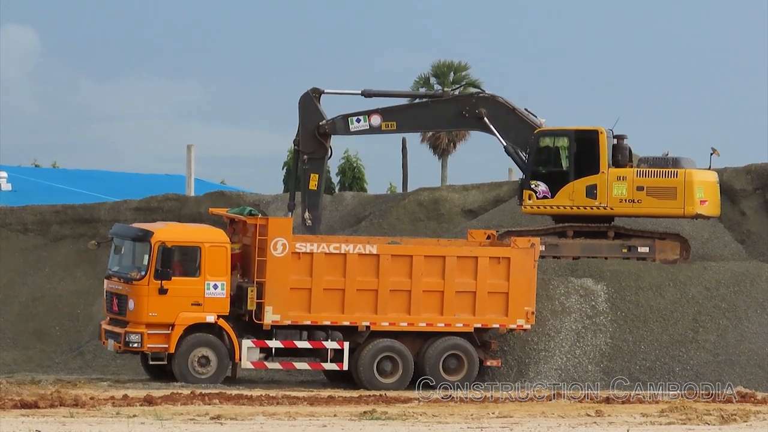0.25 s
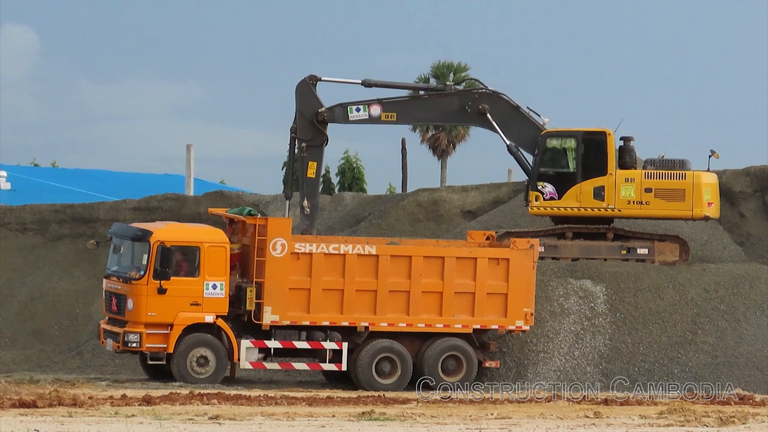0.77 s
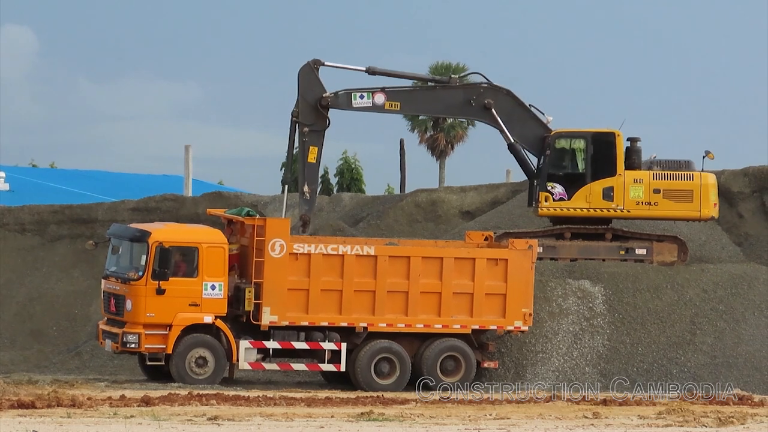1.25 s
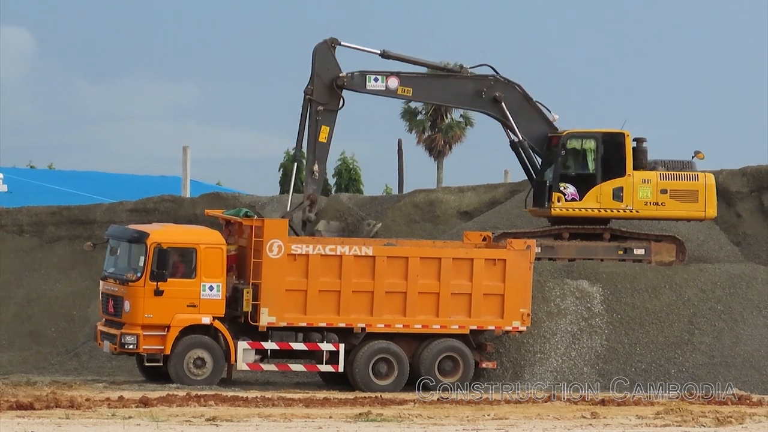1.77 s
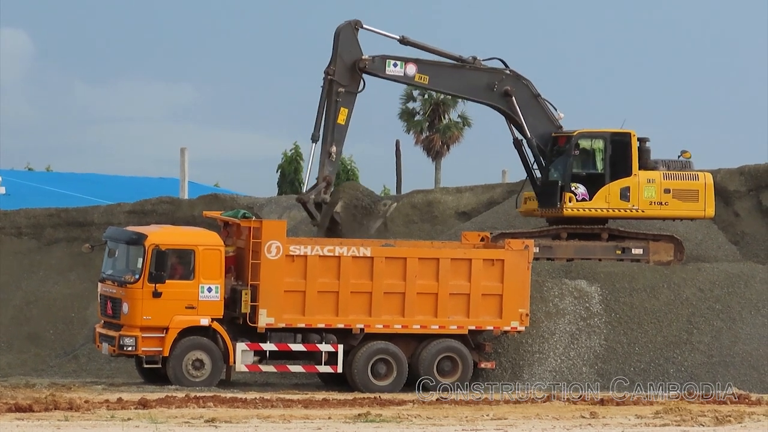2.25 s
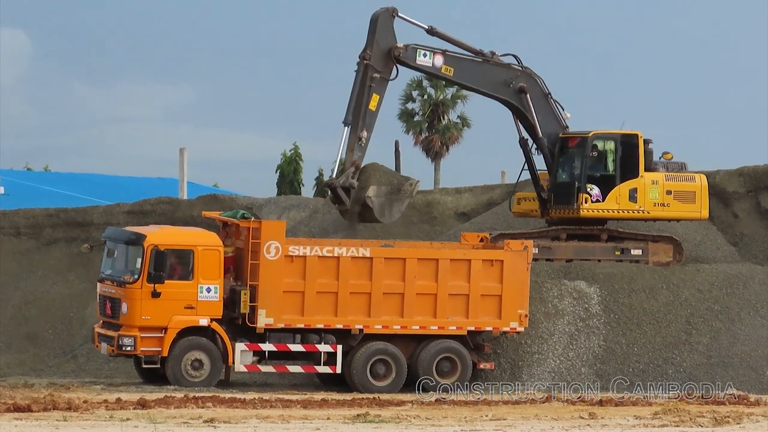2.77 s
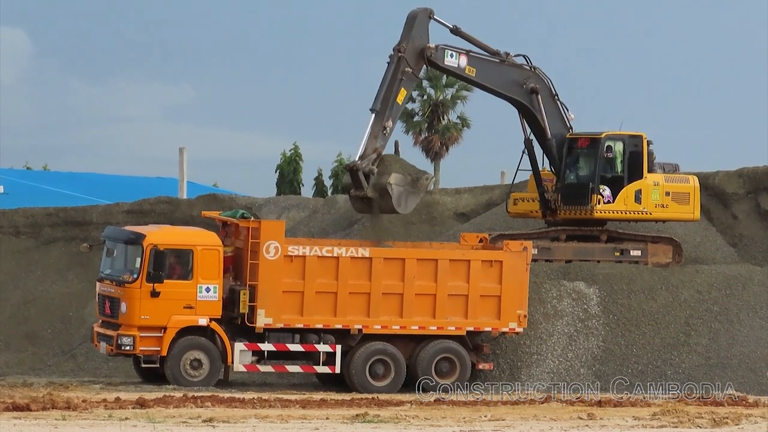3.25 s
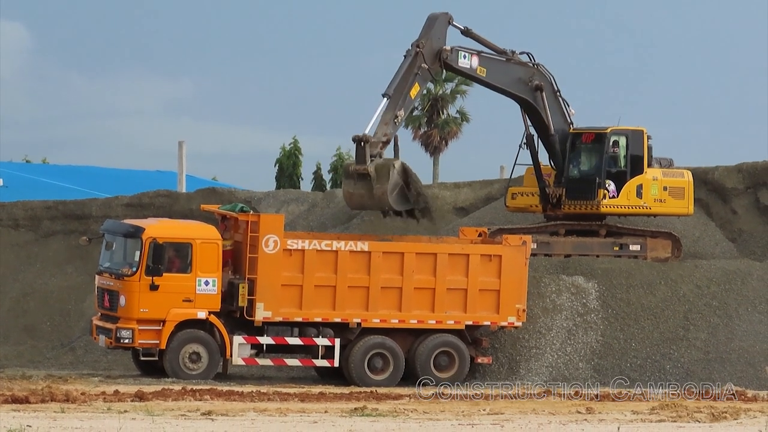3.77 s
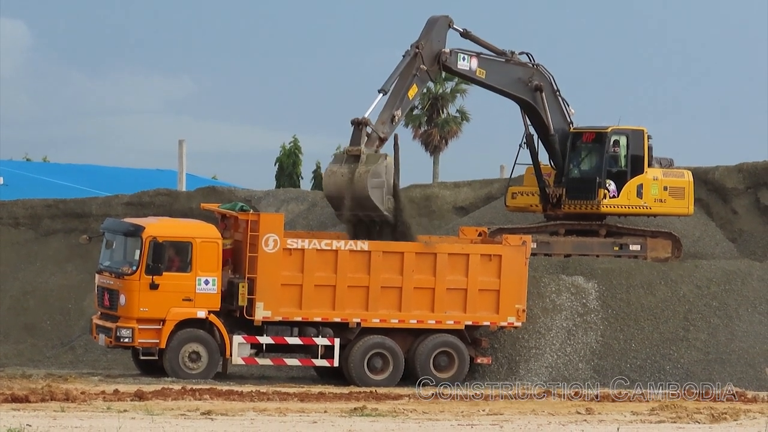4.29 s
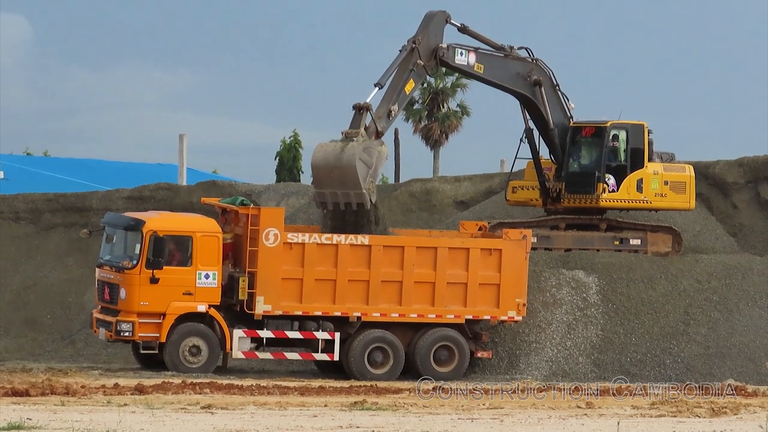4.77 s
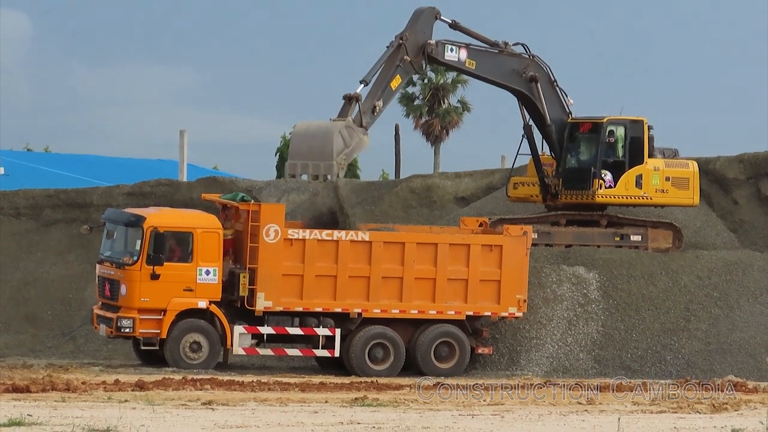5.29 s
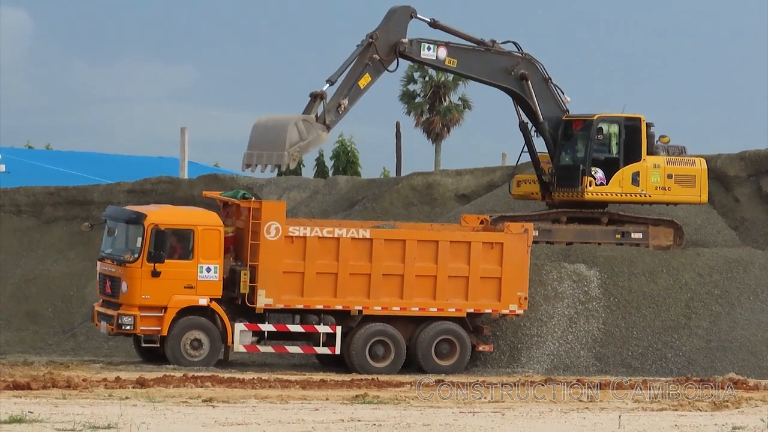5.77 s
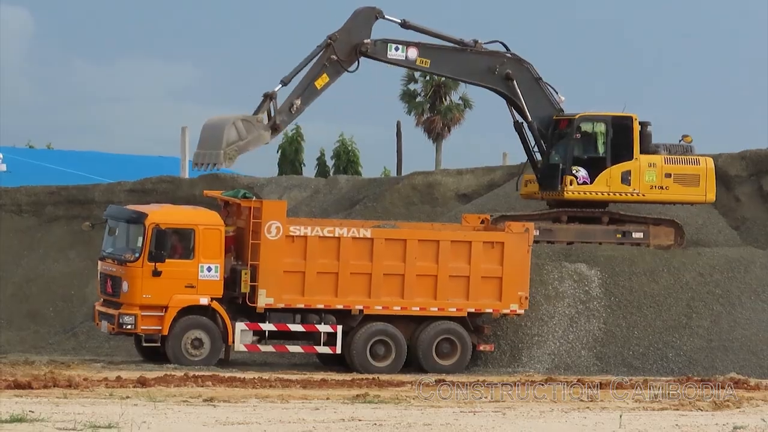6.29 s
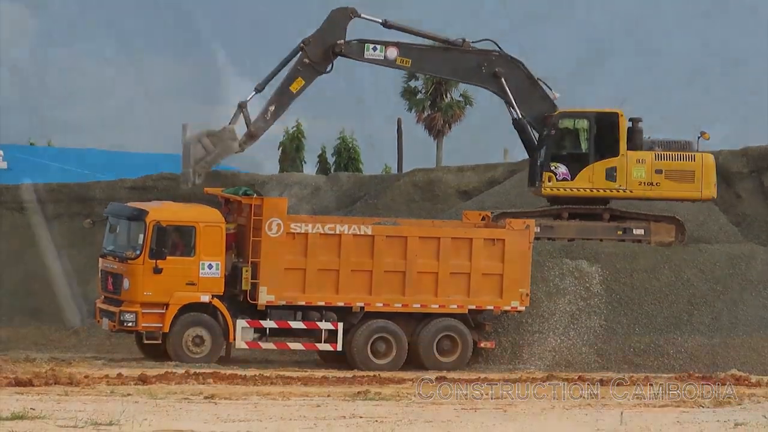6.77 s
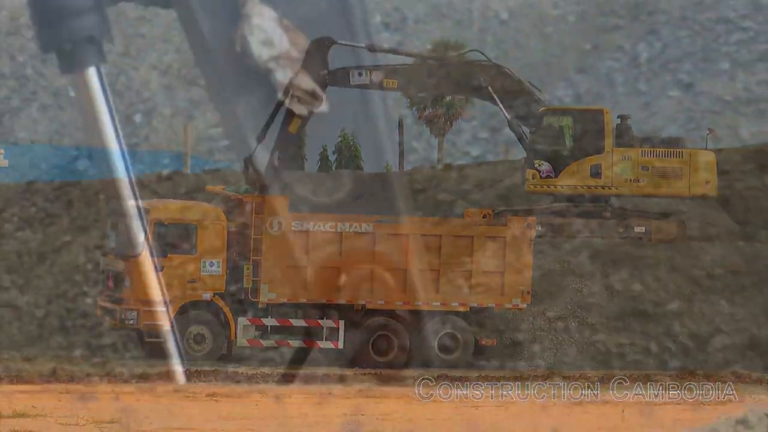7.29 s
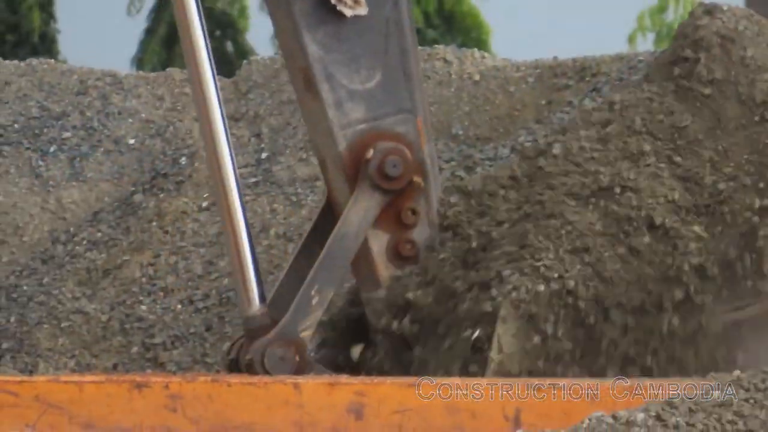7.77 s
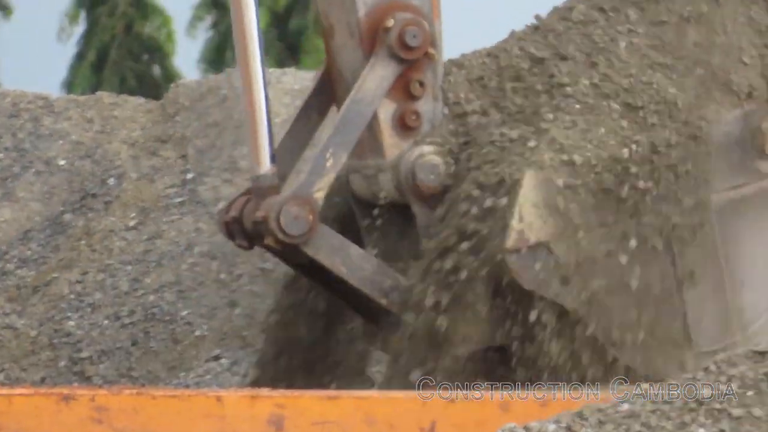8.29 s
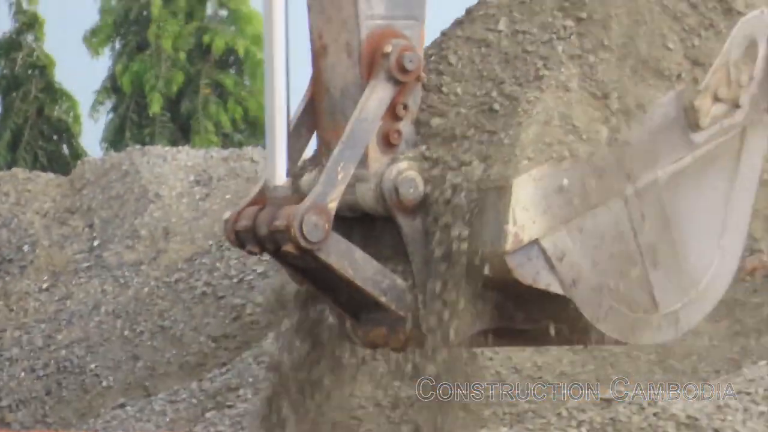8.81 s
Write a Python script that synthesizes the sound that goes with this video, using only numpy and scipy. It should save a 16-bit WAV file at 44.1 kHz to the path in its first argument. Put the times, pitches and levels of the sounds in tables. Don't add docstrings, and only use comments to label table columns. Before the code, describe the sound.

Steady low diesel idle drones as gravel pours in bursts onto a steel truck bed, the bucket clanks, then a closer scoop heaves and squeaks.

```python
import sys
import numpy as np
from scipy import signal
from scipy.fft import rfft, irfft, next_fast_len
from scipy.io import wavfile

SR = 44100
rng = np.random.default_rng(int(sys.argv[2]) if len(sys.argv) > 2 else 0)


def voltage_ratio(decibels):
    exponent = np.asarray(decibels, float) / 20
    return 10 ** exponent


def store_wav(level_fs):
    pcm = np.round(np.clip(np.atleast_2d(level_fs), -1, 1) * 32767)
    wavfile.write(sys.argv[1], SR, pcm.T.astype(np.int16))


N = 398663
CUT_S = 7.195
SQUEAL_START_S, SQUEAL_END_S = 7.875, 8.05

# time in s, firing rate in Hz, level in dB.
TRUCK_IDLE = [(0, 37.39, -23.5), (2, 37.71, -23), (4, 37.02, -23), (5.5, 37.31, -23), (7.19, 37.46, -23)]


def in_time(rows):
    s, *columns = np.transpose(rows)
    return [np.interp(np.arange(N) / SR, s, c) for c in columns]


def rms_one(x):
    return x / np.sqrt(np.mean(x ** 2) + 1e-20)


def gate(start_s, end_s, fade_s=0.0072):
    t = np.arange(N) / SR
    return np.clip((t - start_s) / fade_s, 0, 1) * np.clip((end_s - t) / fade_s, 0, 1)


def drift(rate_hz):
    r = np.exp(-2 * np.pi * rate_hz * 40 / SR)
    slow = signal.lfilter([1], [1, -2 * r, r * r], rng.standard_normal(N // 40 + 2002))
    slow = slow[2000:]
    return np.interp(np.arange(N) / 40, np.arange(len(slow)), rms_one(slow))


def resonate(x, hz, width_hz):
    r = np.exp(-np.pi * width_hz / SR)
    poles = [1, -2 * r * np.cos(2 * np.pi * hz / SR), r * r]
    return signal.lfilter([(1 - r * r) / 2, 0, (r * r - 1) / 2], poles, x)


def through(x, bands):
    out = 0
    for k, (hz, width_hz, db) in enumerate(bands):
        ring = resonate(resonate(x, hz, 1.46 * width_hz), hz, 1.46 * width_hz)
        out = out + voltage_ratio(db) * rms_one(ring) * (-1) ** k
    return out


def wobbly_sine(hz, level_db, wobble_db):
    phase = 2 * np.pi * np.cumsum(hz * np.ones(N)) / SR
    phase = phase + .15 * wobble_db * drift(1.5) + rng.uniform(0, 2 * np.pi)
    return np.sqrt(2) * voltage_ratio(level_db + wobble_db * np.tanh(drift(2.3))) * np.sin(phase)


def strokes(rows, fade_s, wobble_db):
    glide, level = [], 0
    for start_s, end_s, start_hz, end_hz, db in rows:
        glide += [(start_s, start_hz), (end_s, end_hz)]
        level = level + voltage_ratio(db) * gate(start_s, end_s, fade_s)
    hz, = in_time(glide)
    return wobbly_sine(hz, 0, wobble_db) * level


def peak_db(t, s, rise_ms, fall_ms):
    return -1e4 * np.maximum((s - t) / rise_ms, (t - s) / fall_ms)


def burst(length_s, t60_s):
    t = np.arange(int(length_s * SR)) / SR
    return rng.standard_normal(len(t)) * voltage_ratio(-60 * t / t60_s)


def add(track, s, sound):
    at = int(s * SR)
    track[at:at + len(sound)] += sound[:N - at]


def truck():
    # multiple of the firing rate, level against the idle in dB.
    orders = [(0.498, -42), (.75, -27), (0.828, -15), (1, 3), (2, -21), (3, -16.5), (4, -24), (5, -26),
              (6.5, -25), (7, -28.5), (8, -31.5)]
    # frequency in Hz, level in dB.
    whines = [(82.8, -41.5), (389.6, -65.5), (537.7, -52.5), (621, -62), (860, -73), (1050, -61),
              (1798, -58.5), (2864, -60), (3338, -62)]
    hz, level_db = in_time(TRUCK_IDLE)
    lines = sum(wobbly_sine(k * hz, level_db + db, .3 + abs(db) / 12) for k, db in orders)
    return gate(-1, CUT_S) * (lines + sum(wobbly_sine(*line, 3) for line in whines))


def excavator():
    # time in s, half firing rate in Hz, level in dB.
    engine = [(0, 48.5, -32.5), (1.5, 47.45, -30), (2.5, 48.14, -40), (3.5, 49.44, -30), (4.5, 47.6, -40),
              (5.5, 49.47, -38), (7.19, 48.32, -31.5), (7.2, 44, -27), (7.6, 45.2, -36.5),
              (8.2, 46.34, -32.5), (9.04, 49, -37.5)]
    # multiple of half the firing rate, level in dB.
    orders = [(1, -6.5), (2, -11), (3, -14.5), (4, -11.5), (7, -23.5)]
    # peak time in s, firing line gain in dB.
    heaves = [
        (7.65, 15.5),
        (8.1, 15),
        (8.9, 15.5),
    ]
    hz, level_db = in_time(engine)
    firing_db, = in_time([(0, -7.5), (CUT_S, 5)])
    for s, db in heaves:
        firing_db = np.maximum(firing_db, db + peak_db(np.arange(N) / SR, s, 220, 220))
    return sum(wobbly_sine(k * hz, level_db + db + (k == 2) * firing_db, 3) for k, db in orders)


def roar(spectrum, patchy_db, throb, load_db):
    # centre in Hz, width in Hz, gain in dB.
    cover = [(196, 30, -3.5), (740, 90, 4.5), (1100, 420, 3.5), (1730, 230, 1.5), (2600, 380, 0.5),
             (3695, 190, 3.5)]
    size = next_fast_len(N)
    hz = np.maximum(np.fft.rfftfreq(size, 1 / SR), 1)
    points = np.array(spectrum)
    colour_db = np.interp(np.log(hz), np.log(points[:, 0]), points[:, 1])
    colour_db = colour_db + sum(db / (1 + (2 * (hz - top) / width) ** 2) for top, width, db in cover)
    bins = rfft(rng.standard_normal(size)) * voltage_ratio(colour_db)
    together, out = drift(0.94), 0
    for octave in range(10):
        share = np.clip(1 - np.abs(np.log2(hz / 30) - octave), 0, 1)
        bright = np.clip((octave - 4) / 2, 0, 1)
        flicker_db = patchy_db * (.5 * together + drift(2.9))
        out = out + irfft(bins * share, size)[:N] * voltage_ratio(flicker_db + bright * load_db)
    beat = np.cos(2 * np.pi * np.cumsum(in_time(TRUCK_IDLE)[0]) / SR)
    return rms_one(out) * (1 + throb * beat)


def roars():
    # frequency in Hz, density in dB per Hz.
    wide_spectrum = [(15, -26), (40, -22), (56, -7.5), (75, -14.5), (117, -10), (145, -15), (182, -14),
                     (247, -18.5), (368, -29.5), (535, -30), (937, -34), (2170, -35), (2750, -32),
                     (8840, -51.5), (15500, -80)]
    close_spectrum = [(14, -30), (22, -12), (35, 1), (92, 1.5), (196, -6), (290, -16), (650, -20.5),
                      (1270, -23), (2200, -22), (3000, -22), (4300, -28), (7000, -33.5), (8800, -42.5),
                      (15500, -62)]
    # time in s, treble gain in dB.
    load = [(0, 1.5), (1.5, 2), (3, -0.5), (6.6, -1.5), (7.19, -1), (8, -3), (9.04, -3.5)]
    load_db, = in_time(load)
    before = gate(-1, CUT_S)
    wide = voltage_ratio(-32) * roar(wide_spectrum, patchy_db=0.55, throb=.04, load_db=load_db)
    close = voltage_ratio(-30) * roar(close_spectrum, patchy_db=.5, throb=0, load_db=load_db)
    return before * wide + (1 - before) * close


def grains(bands, per_s, spread_db, clump_db):
    sizes = voltage_ratio(spread_db * np.minimum(rng.exponential(1, N), 5)) * rng.choice([-1, 1], N)
    hits = sizes * (rng.random(N) < per_s / SR) + 1e-18
    rings = 0
    for k, band in enumerate(bands):
        own_hits = np.roll(hits, 9973 * k)
        rings = rings + through(own_hits, [band]) * voltage_ratio(clump_db * drift(12.0))
    return rms_one(rings) * voltage_ratio(clump_db * drift(35.0))


def flow():
    # peak in s, level in dB, rise and fall in ms per 10 dB, coarseness in dB.
    slugs = [(3.165, -36, 51, 80, 2.5), (3.225, -31.5, 68, 200, 6.5), (3.4, -32.5, 38, 58, 3.5),
             (3.53, -37, 140, 80, 0.5), (3.643, -35.5, 54, 250, -4), (3.785, -33.5, 430, 180, 1),
             (4.023, -33, 95, 45, 0.5), (4.075, -34.5, 19, 90, -0.5), (4.171, -35.5, 22, 320, -2),
             (4.405, -29, 130, 190, -2.5), (4.519, -31.5, 47, 50, -0.5), (4.66, -38, 600, 550, -3),
             (4.87, -43.5, 60, 100, 6.5), (4.912, -34, 22, 27, -2), (5.175, -39, 332, 180, 2.5),
             (5.58, -39, 360, 221, -1.5), (5.75, -45, 231, 550, 1.5)]
    t, power = np.arange(0, N / SR, .002), 1e-12
    for s, level_db, rise_ms, fall_ms, coarse_db in slugs:
        shares_db = np.array([[-2 + coarse_db], [0], [-10 - .9 * coarse_db]])
        power = power + voltage_ratio(2 * (shares_db + level_db + peak_db(t, s, rise_ms, fall_ms)))
    return in_time(np.transpose([t, *np.sqrt(power)]))


def gravel():
    # time in s, level in dB.
    trickle_flow = [(.8, -64), (1.5, -51), (2.2, -49), (3.05, -48), (3.3, -56), (5.9, -51.5), (6.15, -58),
                    (6.55, -65), (7.1, -53.5), (7.6, -56.5), (8.1, -57.5), (8.3, -51), (8.7, -43.5),
                    (9.04, -44)]
    # centre in Hz, width in Hz, level in dB.
    fines_bands = [(4660, 2400, -3), (6150, 1200, 0.5), (7270, 760, -2)]
    stone_bands = [(1113, 170, -12.5), (1600, 200, -9.5), (1950, 120, -9.5), (2470, 230, -6.5),
                   (2805, 430, -1.5), (3250, 520, -1), (3290, 39, -7), (3860, 540, -4), (4560, 440, -9.5)]
    slide_bands = [(4300, 1700, -1), (5735, 1040, 0), (6300, 880, -2.5), (7070, 810, 0)]
    grit_bands = [(8380, 2400, 3.5), (10000, 1300, -3), (10900, 600, -9), (11900, 550, -12),
                  (14200, 1500, -39)]
    fines = grains(fines_bands, 12000, spread_db=2.0, clump_db=0.84)
    grit = grains(grit_bands, 12000, spread_db=2.5, clump_db=0.85)
    stones = grains(stone_bands, 7000, spread_db=1.0, clump_db=1.4)
    slide = grains(slide_bands, 12000, spread_db=1.5, clump_db=1.0)
    trickle = voltage_ratio(in_time(trickle_flow)[0]) * (fines + voltage_ratio(-9.5) * grit)
    pour = sum(gain * share for gain, share in zip(flow(), [stones, slide, grit]))
    pour = gate(3.04, 5.92, 0.069) * pour
    shed = voltage_ratio(-58) * gate(SQUEAL_START_S, SQUEAL_END_S, 0.022) * grit
    return trickle + pour + shed


def pump():
    # start and end in s, start and end in Hz, level in dB.
    whine_strokes = [
        (.9, 1.3, 497, 490, -54),
        (3.05, 3.45, 508.6, 509, -51),
        (3.6, 4.0, 488, 493, -53),
        (4.1, 4.65, 500, 512, -52),
        (5.25, 5.85, 491, 481, -53.5),
    ]
    return gate(-1, CUT_S) * strokes(whine_strokes, 0.066, 4)


def fan():
    # start and end in s, start and end in Hz, level in dB.
    efforts = [
        (1.9, 2.6, 49.5, 51.5, -36),
        (2.9, 4.6, 53.23, 53.14, -29.5),
        (5.05, 5.6, 52.1, 54, -30.5),
        (5.85, 7.0, 51.46, 54.8, -32.5),
    ]
    return gate(-1, CUT_S) * strokes(efforts, 0.13, 1.8)


def ticks(table, breadth, trim_db):
    out = np.zeros(N)
    for s, top_db, hz, t60_s in table:
        crack = through(burst(.15, max(t60_s, .005)), [(hz, breadth * hz, 0)])
        add(out, s, voltage_ratio(top_db + trim_db) * crack / np.abs(crack).max())
    return out


def single_stones():
    # time in s, peak in dB, pitch in Hz.
    stones = [(3.1595, -21, 2870), (3.192, -26, 3310), (3.385, -21, 3370), (3.636, -27, 3356),
              (4.0677, -28, 3350), (4.193, -25, 3360), (4.6504, -27, 2600), (4.8512, -31, 3250),
              (4.868, -24, 3770), (5.1076, -32, 2880), (5.5692, -33, 6474), (6.475, -30, 1290),
              (7.1556, -23.5, 1950)]
    return ticks([(*row, 0.065) for row in stones], breadth=0.61, trim_db=0.5)


def chips():
    # time in s, peak in dB, pitch in Hz.
    hits = [(3.488, -34, 8540), (4.068, -33, 8660), (4.1679, -25, 9850), (4.2974, -29, 9840),
            (4.3895, -22, 8900), (4.5194, -22, 9060), (4.65, -30, 9910), (4.7222, -29, 9730),
            (4.9062, -23, 10700), (4.9813, -26, 9800), (5.2071, -37, 8880), (6.268, -43, 11000),
            (7.872, -42, 8590), (7.888, -32, 8680), (7.9364, -38, 10700), (8.0294, -42, 8540),
            (8.0681, -44, 8640), (8.2194, -46, 8520)]
    return ticks([(*row, 0.036) for row in hits], breadth=0.22, trim_db=-3.5)


def pin_knocks():
    # time in s, peak in dB, pitch in Hz, t60 in s.
    knocks = [
        (4.905, -25.5, 3000, .1),
        (4.907, -25, 6500, .06),
        (7.863, -32, 3500, .08),
        (7.867, -32, 1400, 0.052),
        (7.888, -26.5, 4200, 0.04),
        (7.937, -28.5, 430, 0.095),
        (7.938, -36, 1100, .06),
        (7.938, -29, 2300, 0.045),
        (7.938, -34, 6000, .03),
    ]
    return ticks(knocks, breadth=0.3, trim_db=0)


def rock():
    impact = (4.9815, -29.5, 0.17)
    # centre in Hz, width in Hz, level in dB.
    plate_bands = [(1870, 450, -7), (2500, 450, -3), (3000, 550, 3), (3370, 33, -0.5), (3830, 700, -3),
                   (4500, 1100, 1), (5530, 760, 3.5), (6120, 830, 0), (7350, 720, -8)]
    s, level_db, t60_s = impact
    out, force = np.zeros(N), burst(.2, t60_s)
    force = force * np.minimum(1.1 + np.arange(len(force)) / (0.003 * SR), 1)
    add(out, s, voltage_ratio(level_db) * rms_one(through(force, plate_bands)))
    return out


def struck(excitation, modes):
    out = 0
    for hz, level_db, t60_s in modes:
        r, w = voltage_ratio(-60 / (t60_s * SR)), 2 * np.pi * hz / SR
        ring = signal.lfilter([0, np.sin(w)], [1, -2 * r * np.cos(w), r * r], excitation)
        out = out + voltage_ratio(level_db) * ring
    return out


def clank():
    # time in s, level in dB, hardness in Hz, t60 in s.
    blows = [
        (5.822, -24.5, 4970, .2),
        (5.835, -23.5, 3000, 0.18),
        (5.85, -24, 3000, 0.18),
        (5.862, -18.5, 5000, 0.17),
        (5.877, -28, 4000, 0.21),
        (5.906, -27.5, 2000, .2),
        (5.939, -25, 4000, 0.21),
        (5.968, -33.5, 2500, 0.25),
        (6.0, -44, 1500, 0.23),
        (6.06, -38, 2500, 0.37),
    ]
    # frequency in Hz, level in dB, t60 in s.
    plate_modes = [(179.5, -5, 0.29), (191.5, 4.5, 0.54), (206.3, -4, 0.44), (222, -5, 0.39),
                   (288.4, -7.5, 0.45), (399.4, -2.5, 0.34), (432, -15, .4), (466, -6.5, .4),
                   (627, -3, 0.52), (703, -4, 0.24), (765, -12, 0.33), (854, -4, .3), (975, -4.5, 0.28),
                   (1037, -13, 0.97), (1130, -3, 0.28), (1690, -8, .12), (1780, -3, 0.14),
                   (2600, -6, 0.098), (2760, -3, .1), (3180, -10, .1)]
    # centre in Hz, width in Hz, level in dB.
    plate_bands = [(200, 91, -8), (418, 95, -4.5), (675, 130, -1.5), (1095, 150, -2), (1420, 170, -9),
                   (1800, 240, 0), (2560, 380, 0.5), (3120, 450, -2), (3900, 850, -8.5), (5500, 600, -14.5),
                   (7000, 1200, -17)]
    force = np.zeros(N) + 1e-18
    for s, level_db, hard_hz, t60_s in blows:
        soften = signal.butter(1, min(hard_hz, 15000), fs=SR, output="sos")
        add(force, s, voltage_ratio(level_db) * signal.sosfilt(soften, burst(.3, t60_s)))
    start, out = int(5.8 * SR), np.zeros(N)
    force = force[start:start + SR]
    ringing = voltage_ratio(-36.5) * struck(force, plate_modes) + voltage_ratio(-40.5) * through(force, plate_bands)
    add(out, start / SR, ringing)
    return out


def far_engine():
    # frequency in Hz, level in dB.
    lines = [(25.6, -42.5), (31, -45), (52, -37.5), (64.3, -48), (128, -44), (192.5, -41.5), (1314, -58)]
    return (1 - gate(-1, CUT_S)) * sum(wobbly_sine(*line, 2.3) for line in lines)


def squeal():
    friction = through(rng.standard_normal(N), [(6120, 150, 0)])
    return voltage_ratio(-55) * gate(SQUEAL_START_S, SQUEAL_END_S, .02) * friction


def scene():
    sound = truck() + excavator() + roars() + gravel() + pump() + fan()
    sound = sound + single_stones() + chips() + pin_knocks() + rock() + clank()
    sound = sound + far_engine() + squeal()
    return np.stack([sound, sound])


def band_limit(x):
    return signal.sosfilt(signal.butter(12, 15910, fs=SR, output="sos"), x)


def record(dry):
    b, a = signal.butter(2, 130, "high", fs=SR)
    left = signal.lfilter(2 * a, 2 * a - b, dry[0])
    right = left - signal.lfilter(b, a, left)
    right = signal.lfilter(*signal.butter(1, 6000, fs=SR), right)
    hiss = rng.standard_normal((4, N))
    shared_hiss = voltage_ratio(-60) * signal.lfilter(*signal.butter(2, 9500, "high", fs=SR), hiss[2])
    rumble = rms_one(signal.lfilter(*signal.butter(2, [50, 170], "band", fs=SR), hiss[3]))
    right = right + voltage_ratio(-49) * rumble
    pair = np.stack([left, right]) + shared_hiss + voltage_ratio(-65.5) * hiss[:2]
    return band_limit(np.clip(pair, -.99, .99))


dry = scene()
out = record(dry)
store_wav(out)
```